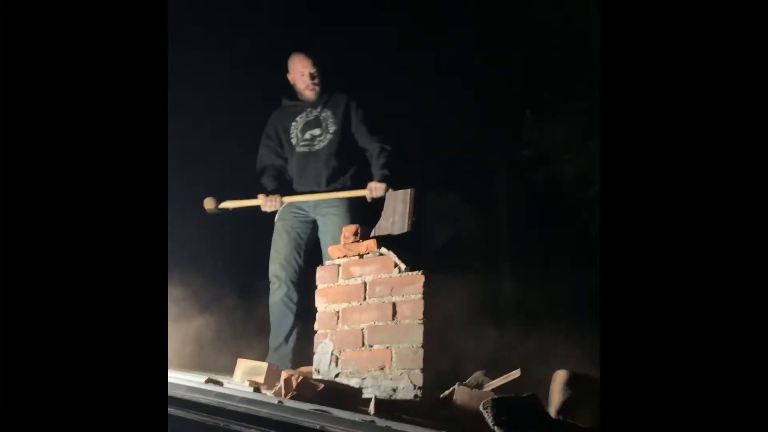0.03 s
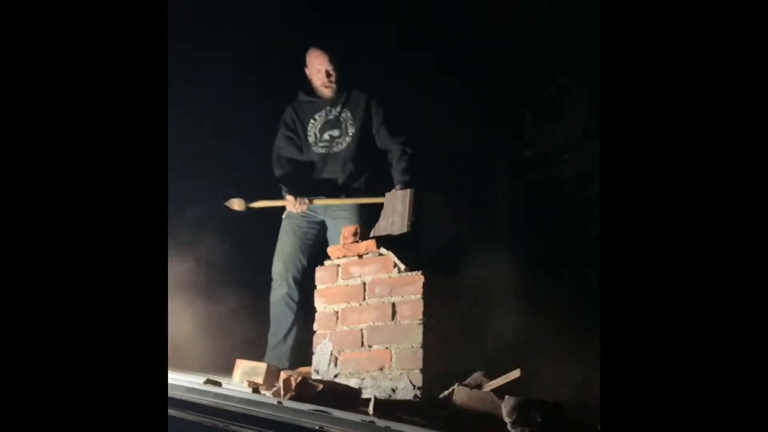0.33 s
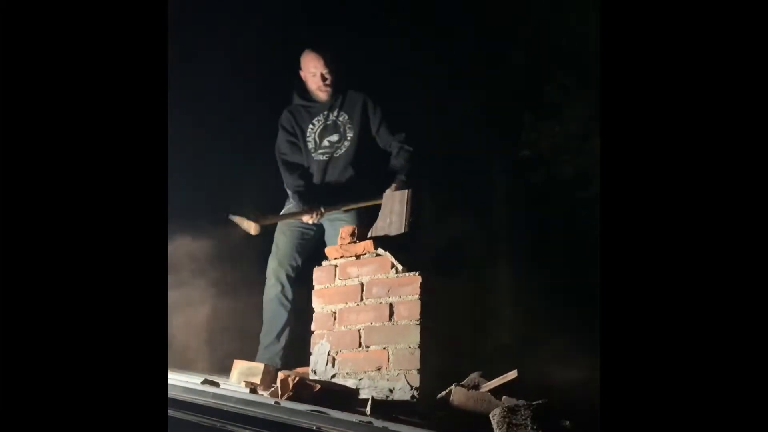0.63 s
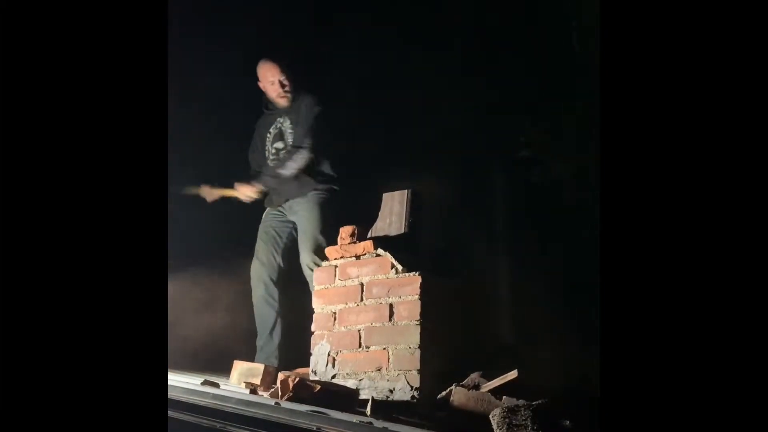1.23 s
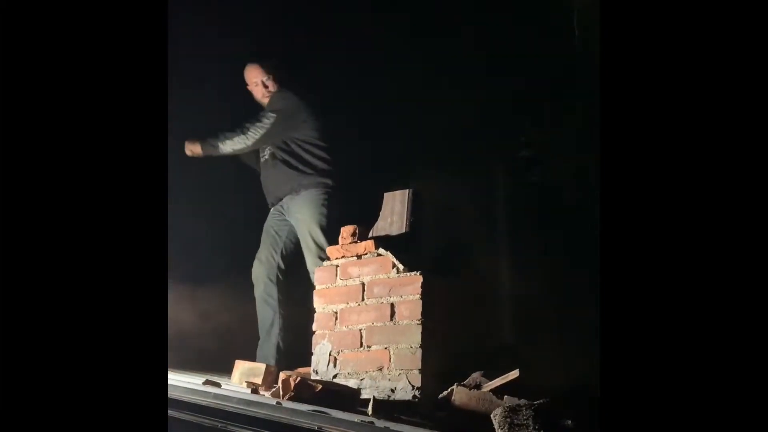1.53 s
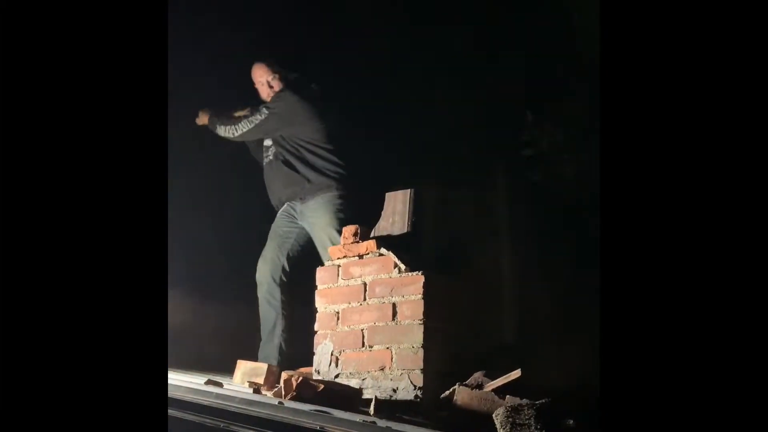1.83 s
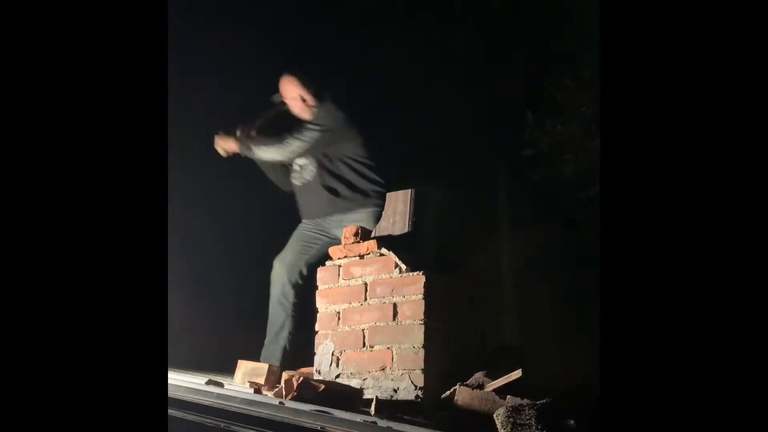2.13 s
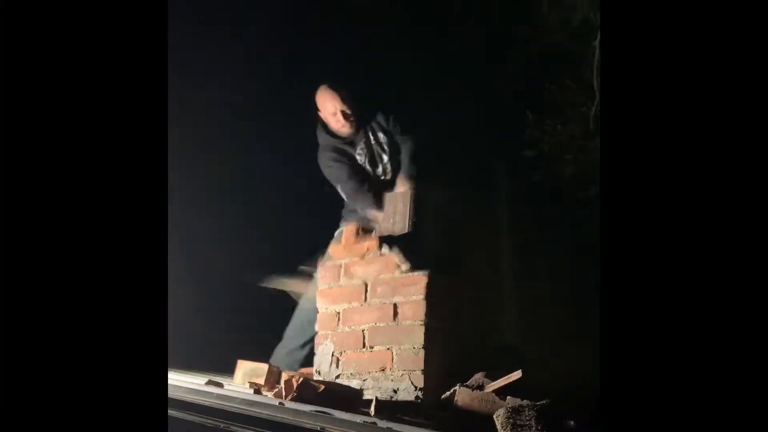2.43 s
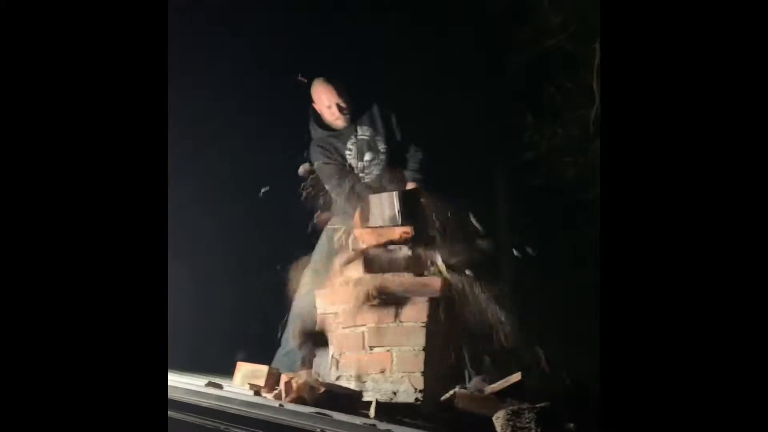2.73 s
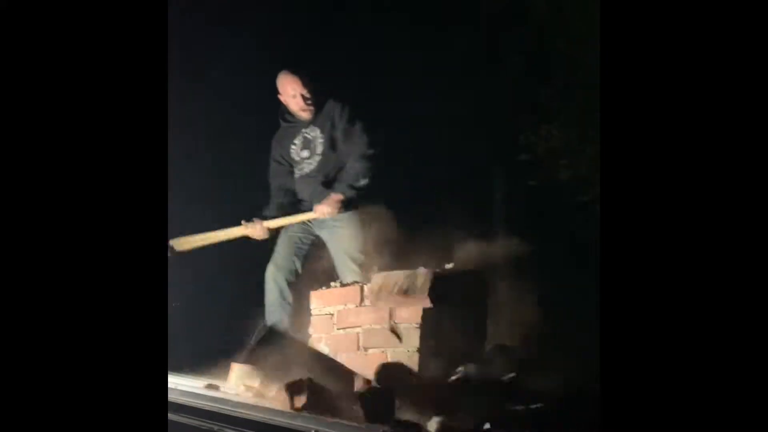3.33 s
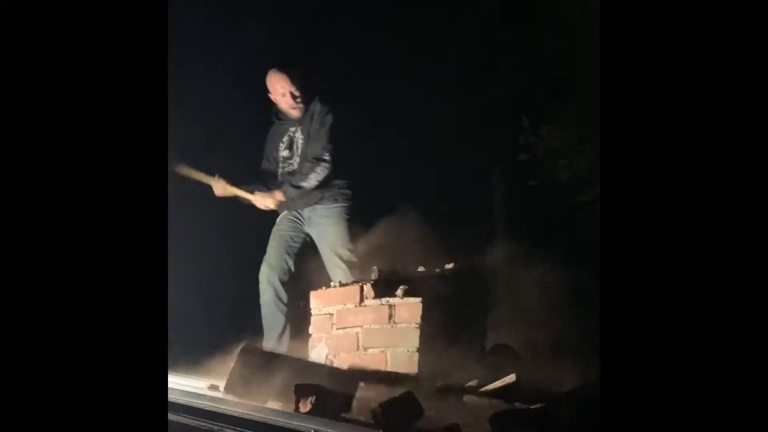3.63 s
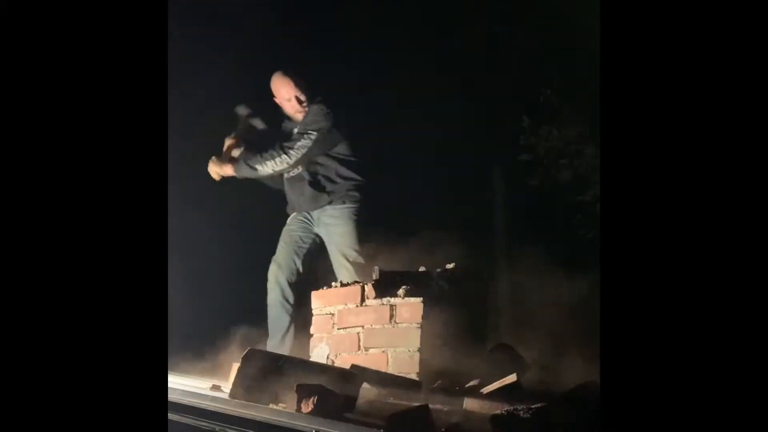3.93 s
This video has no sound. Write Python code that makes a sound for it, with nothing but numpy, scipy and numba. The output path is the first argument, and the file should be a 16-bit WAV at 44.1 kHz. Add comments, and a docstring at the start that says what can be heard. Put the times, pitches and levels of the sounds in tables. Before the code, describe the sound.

A sledgehammer breaks a brick chimney on a roof outdoors. At first, rubble knocks and slides to rest, thinning to faint trickling grit by 1 second. Boots scuff softly around 2 seconds. At about 2.4 seconds the steel head strikes and rings, and the roof booms. From 2.8 seconds bricks crash and tumble loudly, with thuds, clinks and spraying mortar, echoing lightly and dying down near 4 seconds.

```python
"""A sledgehammer breaks up a brick chimney on a roof at night. Rubble settles and grit trickles away;
boots shift, the steel head strikes and rings, the roof booms, and then the bricks crash down and tumble.
Each impact is many tiny fading tones: low thuds of the roof, knocks of brick and a spray of mortar grit.
It is all heard in stereo, a little to one side, along with echoes and the faint night air."""
import sys
import numpy as np
from scipy import signal
from scipy.fft import rfft, irfft, next_fast_len
from scipy.io import wavfile
from numba import njit

SR = 44100
rng = np.random.default_rng(int(sys.argv[2]) if len(sys.argv) > 2 else 0)


def unload_wav(signal):
    """Save mono or channel-first audio to the path in sys.argv[1] as 16-bit WAV at rate SR, clipped to [-1, 1]."""
    wavfile.write(
        sys.argv[1],
        SR,
        np.round(np.clip(np.atleast_2d(signal).T, -1, 1) * 32767).astype(np.int16),
    )


N = 176400

# How strongly a contact sounds each pitch of the roof, brick and grit: f/Hz, level per octave/dB
THUD = [(75, -21), (100, -11), (130, -0.5), (160, 0.5), (210, 2.5), (280, 2.5), (350, 2.5), (470, -3)]
KNOCK = [(450, -3.5), (640, 1.5), (800, 0), (1100, 0.5), (1270, 2), (1500, 1.5), (1800, -0.5), (2300, 0.5),
         (3100, -8)]
GRIT = [(3000, 3.5), (4400, 2), (5700, 8.5), (6700, 3), (7600, -1.5), (9000, 3.5), (12000, -1.5),
        (16000, -5)]
THUD_CYCLES, KNOCK_CYCLES, GRIT_CYCLES = 10, 52, 97  # typical vibrations before a contact dies away


def amp(db):
    """Turn decibels into a gain."""
    return 10 ** (np.asarray(db) / 20)


def unit(x):
    """Scale a sound to an average strength (rms) of 1."""
    return x / np.sqrt(np.mean(x ** 2) + 1e-20)


def along(points, hz):
    """Read a curve of (frequency, value) points at hz, on a logarithmic frequency scale."""
    freqs, values = np.transpose(points)
    return np.interp(np.log(hz + 1), np.log(freqs + 1), values)


def levels(rows):
    """Turn rows of a time and dB levels into gain curves that fade quickly outside those times."""
    times, *columns = np.transpose(rows)
    t = np.arange(N) / SR
    gate = np.clip(1 + np.minimum(t - times[0], times[-1] - t) / .01, 0, 1)
    return np.array([gate * amp(np.interp(t, times, db)) for db in columns])


def filtered(x, response):
    """Change the strength and phase of each frequency by response(hz)."""
    size = next_fast_len(N + SR // 2)
    hz = np.fft.rfftfreq(size, 1 / SR)
    return irfft(rfft(x, size) * response(hz), size)[..., :N]


def noise(colour):
    """Noise of strength 1, with its lows and highs shaped by the colour curve."""
    return unit(filtered(rng.standard_normal(N), lambda hz: amp(along(colour, hz))))


@njit
def rings(s, hz, gain, t60):
    """Add up fading tones that start at times s; t60 is the time each takes to fall by 60 dB."""
    out = np.zeros(N)
    for k in range(len(s)):
        start = max(int(s[k] * SR), 0)
        tone = gain[k] + 0j
        step = np.exp((2j * np.pi * hz[k] - np.log(1000) / t60[k]) / SR)
        for i in range(start, min(N, start + int(1.3 * t60[k] * SR))):
            out[i] += tone.imag
            tone *= step
    return out


def struck(s, tones):
    """An object hit at time s rings with all its tones at once."""
    hz, db, t60 = np.transpose(tones)
    return rings(np.full(len(hz), float(s)), hz.copy(), amp(db), t60.copy())


def contacts(s, size, pitches, cycles, rise_cycles=0.29):
    """Each contact swells and rings briefly at a random pitch of its material."""
    pitch_draw, decay_draw, sign_draw = rng.random((len(s), 3)).T
    lowest, highest = pitches[0][0], pitches[-1][0]
    hz = lowest * (highest / lowest) ** pitch_draw
    t60 = cycles / hz * 3 ** (2 * decay_draw - 1)
    gain = np.sign(sign_draw - .5) * size * amp(along(pitches, hz)) / np.sqrt(t60)
    rise = 1 / (1 / t60 + hz / (np.log(1000) * rise_cycles))
    return rings(s, hz, gain, t60) - rings(s, hz, gain, rise)  # taking away a short tone softens the start


def clatter(pitches, cycles, spread_db, count, tones):
    """Pieces of uneven size land at random times, each with a few tones."""
    times = rng.random(count) * N / SR
    sizes = amp(spread_db * np.clip(rng.standard_normal(count), -2, 2))
    return unit(contacts(np.repeat(times, tones), np.repeat(sizes, tones), pitches, cycles))


def burst(s, db, scatter_s, pitches, cycles, count):
    """A quick cluster of contacts, with the energy of 20 ms of sound at level db."""
    delay = scatter_s * rng.standard_exponential(count)
    cluster = contacts(s + delay - delay.min(), np.ones(count), pitches, cycles)
    return amp(db) * cluster * np.sqrt(.02 * SR / (np.sum(cluster ** 2) + 1e-20))


def crunch(s, dbs, scatter_s, damping=1, knock=KNOCK, grit=GRIT):
    """One impact: thuds of the roof, knocks of brick and a spray of grit."""
    return (burst(s, dbs[0], scatter_s, THUD, THUD_CYCLES / damping, count=8)
            + burst(s, dbs[1], scatter_s, knock, KNOCK_CYCLES / damping, count=20)
            + burst(s, dbs[2], scatter_s, grit, GRIT_CYCLES / damping, count=120))


def rubble(flow, trim_db, grit, knock_spread_db, grit_spread_db, count):
    """Fragments tumble over the roof; trim_db adjusts the thuds, knocks and grit, in that order."""
    streams = [clatter(THUD, THUD_CYCLES, spread_db=2, count=2600, tones=2),
               clatter(KNOCK, KNOCK_CYCLES, spread_db=knock_spread_db, count=count, tones=3),
               clatter(grit, GRIT_CYCLES, spread_db=grit_spread_db, count=16 * count, tones=2)]
    return amp(trim_db) @ (levels(flow) * streams)


def settling():
    """Loose rubble slides to rest and fine grit trickles away."""
    # The slide, before trimming: t/s, thud level/dB, knock level/dB, grit level/dB
    flow = [(0, -18.5, -20.5, -26.5), (.08, -30.5, -29, -37), (.14, -37, -38.5, -37),
            (.175, -28, -24.5, -26), (.26, -36, -31.5, -35.5), (.36, -26, -30, -32),
            (.49, -39, -40.5, -41.5), (.53, -28, -35, -40), (.57, -47, -40.5, -36.5),
            (.63, -34, -39, -36.5), (.79, -52, -53.5, -45), (1.0, -58.5, -58, -46.5),
            (1.2, -64, -56, -49.5), (1.3, -61, -55, -44), (1.39, -69, -71.5, -60.5),
            (1.73, -67, -65.5, -60), (1.85, -68.5, -65.5, -76), (2.02, -67, -67.5, -88)]
    # Pitches of fine grit: f/Hz, level per octave/dB
    fine_grit = [(3000, -3), (4500, 0.5), (6000, 0), (7600, 0), (10000, 2), (13000, 2), (16000, 4)]
    return rubble(flow, [-0.5, -0.5, -1.5], fine_grit, knock_spread_db=0.5, grit_spread_db=1, count=1300)


def roof():
    """The roof booms as it bends under heavy loads and rumbles under the rubble."""
    # The roof's own low tones: f/Hz, level/dB, t60/s
    tones = [(49.6, -18.5, 0.21), (82, -23.5, 0.47), (153, -25, 0.2)]
    # Loads that bend it: t/s, level/dB, boost of higher tones/(dB per octave)
    loads = [(.188, -10, 11.5), (.245, -4.5, 5), (2.144, -18, 0), (2.475, -0.5, -8)]
    # How the rumble swells and fades: t/s, relative level/dB
    swell = [(0, -21), (.05, -31), (.14, -39), (.27, -24), (.33, -33), (.6, -36.5), (.85, -48.5),
             (1.32, -64), (1.56, -61), (2.04, -76.5), (2.16, -34), (2.27, -49), (2.42, -56), (2.48, -19.5),
             (2.71, -37.5), (2.83, -35), (3.2, -25.5), (3.75, -26), (4, -46)]
    # Tone of the rumble: f/Hz, level/dB
    colour = [(15, -25), (30, -2), (50, 2), (85, 4.5), (115, -6), (250, -46)]
    booms = np.zeros(N)
    for s, db, tilt in loads:
        tilted = [(hz, level + db + tilt * np.log2(hz / tones[0][0]), t60) for hz, level, t60 in tones]
        booms += struck(s, tilted)
    return booms + levels(swell)[0] * amp(-3.5) * noise(colour)


def landings():
    """Whole bricks and big lumps hit the roof and crumble; a few ring clearly."""
    # Big pieces landing: t/s, thud level/dB, knock level/dB, grit level/dB
    lumps = [(.021, -23.5, -34, -40), (.154, -26, -28, -38), (.185, -29, -33, -27), (.216, -22, -42, -43),
             (.246, -23, -43, -36), (.333, -33, -33, -33), (.506, -32, -32.5, -43), (.578, -47, -38.5, -45),
             (.615, -38, -36, -39), (.735, -44.5, -49, -47), (1.272, -55, -59, -50),
             (2.773, -27.5, -19, -20), (2.799, -14.5, -13.5, -24), (2.814, -15, -23, -26),
             (2.867, -14.5, -23, -17), (2.881, -15.5, -22, -30), (2.918, -13.5, -18, -20),
             (2.954, -19, -20, -23.5), (2.971, -13.5, -23.5, -37), (3.038, -29, -21, -19),
             (3.069, -11.5, -16.5, -24), (3.0916, -20, -11, -27), (3.134, -19, -15.5, -21),
             (3.163, -14, -16, -22), (3.198, -11.5, -19, -44), (3.264, -16, -19, -23),
             (3.314, -15.5, -19, -29), (3.347, -15, -17, -22.5), (3.38, -28, -17, -26),
             (3.462, -14.5, -15.5, -26.5), (3.503, -14, -13.5, -35), (3.539, -16.5, -29, -20.5),
             (3.598, -15.5, -13.5, -28), (3.621, -15, -20.5, -20), (3.642, -11.5, -19, -21),
             (3.739, -19, -24.5, -34), (3.908, -32.5, -30, -51)]
    # Loose bricks that ring: t/s, f/Hz, level/dB, t60/s
    bricks = [(.505, 1306, -25, 0.048), (0.577, 1430, -25.5, 0.05), (.891, 1950, -31.5, 0.087),
              (1.273, 1650, -41, 0.025), (2.497, 1765, -21.5, 0.071), (2.537, 1780, -21.5, 0.065),
              (2.581, 1735, -20.5, 0.052), (2.703, 2280, -20.5, 0.096), (2.718, 1683, -19, 0.062),
              (3.091, 1760, -13, .035), (3.462, 1027, -10, 0.04), (3.503, 1850, -10.5, 0.047),
              (3.622, 2290, -12, 0.028), (3.909, 1080, -30, 0.065)]
    ringing = sum(clink(*brick) for brick in bricks)
    return ringing + sum(crunch(s, dbs, scatter_s=.0028) for s, *dbs in lumps)


def chips(pitch_ratio=1.7, crumble_s=.0032):
    """Small hard fragments snap off and tick on the roof."""
    # Chips of brick and mortar: t/s, level/dB, centre f/Hz
    snaps = [(.171, -30, 8850), (.2414, -30, 11640), (.343, -32, 11060), (.494, -36, 10900),
             (.6115, -33.5, 10000), (.797, -45.5, 10000), (1.273, -44, 11100), (2.689, -37.5, 7930),
             (2.703, -37, 6940), (2.775, -23, 10960), (2.898, -19.5, 6500), (3.012, -24.5, 11050),
             (3.33, -23.5, 6480), (3.829, -34, 7000), (3.944, -33, 6400), (3.9545, -30.5, 12000)]
    ticks = np.zeros(N)
    for s, db, hz in snaps:
        band = [(hz / pitch_ratio, -7), (hz, 0), (min(hz * pitch_ratio, SR / 2), -7)]
        ticks += burst(s, db, crumble_s, band, GRIT_CYCLES, count=90)
    return ticks


def clink(s, hz, db, t60, count=7, rattle_db=-9.5, rattle_s=.005, detune=0.16):
    """A loose brick rings, and rattles to rest at nearby pitches."""
    times = s + rattle_s * rng.standard_exponential(count)
    pitches = hz * np.exp(detune * rng.standard_normal(count))
    rattle = rings(times, pitches, np.full(count, amp(db + rattle_db)), np.full(count, t60 / 2))
    return struck(s, [(hz, db, t60)]) + rattle


def boots(grind_db=-6.5, grind_s=0.015):
    """The feet shift for the swing: a short scuff, then a softer grinding."""
    # Steps on the gritty roof: t/s, thud level/dB, knock level/dB, grit level/dB, scuff time/s
    steps = [(2.034, -45, -49.5, -57, 0.0035), (2.046, -37, -50, -52, 0.014),
             (2.124, -36, -45.5, -65, 0.0094), (2.148, -42, -57, -58, 0.014), (2.223, -41, -52, -52, .006),
             (2.333, -57.5, -56.5, -55, 0.012)]
    # Pitches of grit under a sole: f/Hz, level per octave/dB
    sole_grit = [(2400, -12), (3500, 8), (6000, 4.5), (9000, -10), (15000, -2)]
    feet = np.zeros(N)
    for s, *dbs, length in steps:
        scuff = crunch(s, dbs, length, damping=2.3, grit=sole_grit)
        grind = crunch(s + length, np.add(dbs, grind_db), grind_s, grit=sole_grit)
        feet += scuff + grind
    return feet


def hammer(ring_at_s=2.4578):
    """The steel head crushes the brick and rings."""
    # It bites and bursts the joint: t/s, thud level/dB, knock level/dB, grit level/dB, crumble time/s
    blow = [(2.432, -46, -28, -52.5, 0.0017), (2.4383, -40.5, -18.5, -40, .0025),
            (2.4436, -31, -16, -29, .0016), (2.461, -28, -23, -33.5, 0.0073)]
    # Brick giving way, and the sharp crack of steel on it: f/Hz, level per octave/dB
    crush = [(420, -2.5), (700, -0.5), (1000, -2), (1300, 1.5), (1900, -2), (2400, -4)]
    crack = [(5500, 7), (7000, -5), (10000, 9), (12000, -11), (16000, -7)]
    # Very short tones in the blow: t/s, f/Hz, level/dB, length/s
    blips = [(2.4368, 1150, -13.5, .008), (2.4438, 754, -4.5, .0048), (2.4436, 1900, -9, .0035)]
    # Tones of the steel head: f/Hz, level/dB, t60/s
    steel = [(1260, -40, .7), (1765, -38, .8), (2304, -43, .8), (4950, -45, .4), (6681, -24.5, .66),
             (6697, -35, .5), (6730, -23, .07), (10110, -32, .55)]
    crushing = sum(crunch(s, dbs, length, damping=2.17, knock=crush, grit=crack)
                   for s, *dbs, length in blow)
    return crushing + sum(blip(*row) for row in blips) + struck(ring_at_s, steel)


def blip(s, hz, db, length):
    """A very short tone in the hammer blow that swells and cuts off."""
    t = np.arange(N) / SR - s
    progress = np.clip(t / length, 0, 1)
    swell = np.sqrt(np.abs(np.sin(np.pi * progress)))
    return amp(db) * np.sin(2 * np.pi * hz * t) * swell


def collapse():
    """After the blow, broken brick and mortar pour onto the roof."""
    # The fall, before trimming: t/s, thud level/dB, knock level/dB, grit level/dB
    flow = [(2.46, -20.5, -34, -35), (2.574, -29, -31, -40.5), (2.738, -30, -31.5, -36),
            (2.794, -20, -13.5, -17.5), (2.966, -9, -14, -18), (3.008, -16, -17.5, -24.5),
            (3.042, -20, -11.5, -12.5), (3.09, -13, -14.5, -17.5), (3.36, -12.5, -12.5, -20.5),
            (3.446, -12.5, -19.5, -25.5), (3.472, -11.5, -15.5, -21.5), (3.562, -14.5, -16.5, -22),
            (3.63, -12.5, -14, -22), (3.934, -31.5, -35, -40), (3.952, -32.5, -31.5, -31),
            (4.0, -35, -31.5, -36)]
    return rubble(flow, [-5.5, -3.5, -3.5], GRIT, knock_spread_db=2.5, grit_spread_db=1.5, count=2200)


def echo(x, decay):
    """Two unrelated washes of echo from the roof, trees or walls."""
    hz, t, spectrum = signal.stft(rng.standard_normal((2, SR // 2)), SR, nperseg=256)
    fade = amp(-60 * t / along(decay, hz)[:, None])
    tails = signal.istft(spectrum * fade, SR, nperseg=256)[1]
    return signal.fftconvolve(x[None], tails / np.linalg.norm(tails[0]), axes=1)[:, :N]


def scene():
    """The work at the chimney, heard a little to one side, with echoes and night air."""
    # How long the yard's echo and the roof's quick reflections last: f/Hz, t60/s
    yard_decay = [(100, 0.17), (1500, 0.67), (6000, 0.8), (14000, 0.74)]
    roof_decay = [(100, 0.066), (14000, .04)]
    # Tone of the night air: f/Hz, level/dB
    air_colour = [(25, 11), (70, -6), (150, -9), (400, -7), (800, -13), (1500, -22), (3600, -14.5),
                  (6000, -31), (16000, -44)]
    # Level of the stereo width at each pitch: f/Hz, level/dB
    width_level = [(60, -21.5), (250, -8), (600, -9.5), (1200, -12), (4000, -22), (14000, -7)]
    # Phase between left and right, rising in steps, which places the sound to one side: f/Hz, phase/rad
    phase_gap = [(50, 0), (550, -.3), (1000, -.18), (1800, 0), (2600, .95), (3700, 1.4), (4450, 2.85),
                 (5100, 3.3), (5800, 4.6), (6600, 6.15), (7400, 6.35), (8500, 9.1), (9500, 9.6),
                 (10600, 12.4), (11500, 12.6), (12600, 15.45), (13700, 15.85), (14800, 18.7)]
    # How much louder the left is than the right: f/Hz, level/dB
    balance = [(60, 0), (170, 2), (450, 0)]
    work = hammer() + boots() + landings() + chips() + roof() + settling() + collapse()
    ahead, around = amp(-8.5) * echo(work, yard_decay)
    air = amp(-61) * noise(air_colour)
    halves = [.5, -.5]  # left and right each take half, in opposite directions
    front = filtered(work + ahead + air, lambda hz: np.exp(1j * np.outer(halves, along(phase_gap, hz))))
    reflections = amp(-11.5) * echo(work, roof_decay)[0]
    width = filtered(around + reflections, lambda hz: amp(along(width_level, hz)))
    stereo = front + np.array([width, -width])
    return filtered(stereo, lambda hz: amp(np.outer(halves, along(balance, hz))))


def record(dry, bottom_hz=24, top_hz=15900):
    """Cut the deepest bass, round off the loudest peaks, then cut the highest treble."""
    x = signal.sosfilt(signal.butter(2, bottom_hz, "highpass", fs=SR, output="sos"), dry)
    rounded = x / (1 + np.abs(x / .95) ** 6) ** (1 / 6)
    return filtered(rounded, lambda hz: 1 / (1 + (hz / top_hz) ** 200))


dry = scene()
out = record(dry)
unload_wav(out)
```